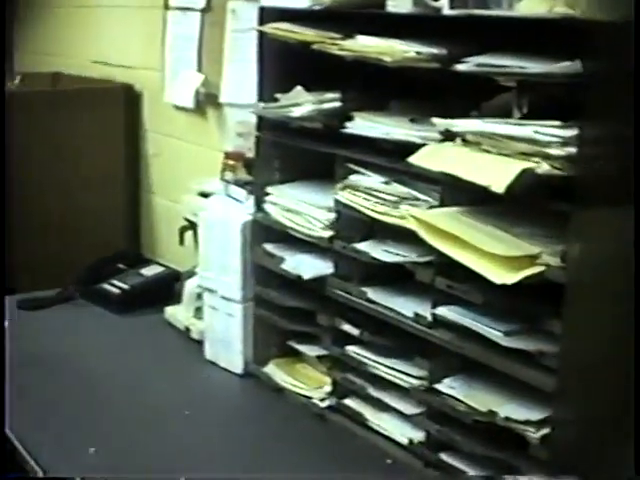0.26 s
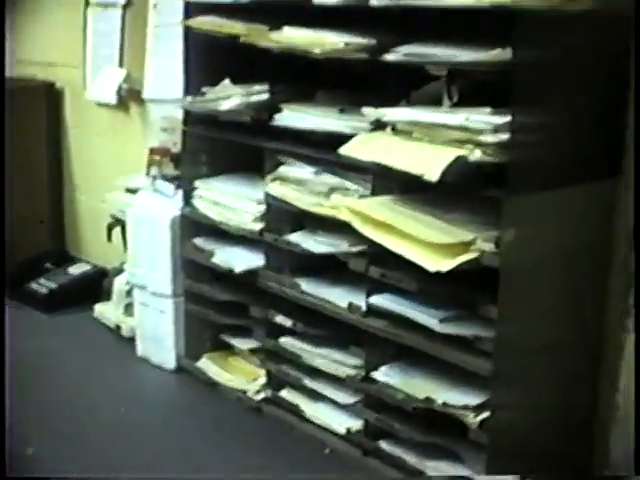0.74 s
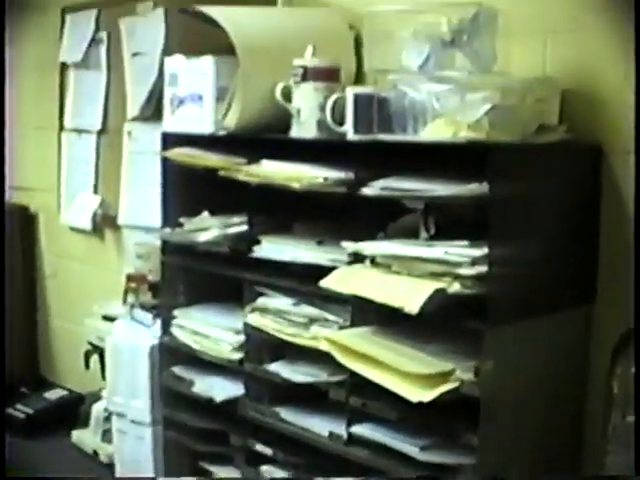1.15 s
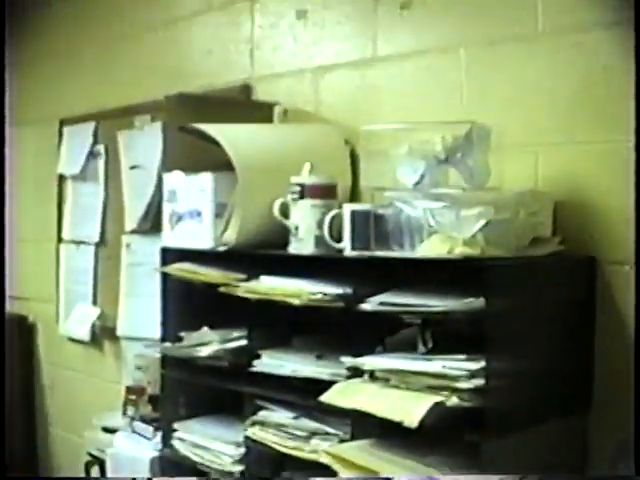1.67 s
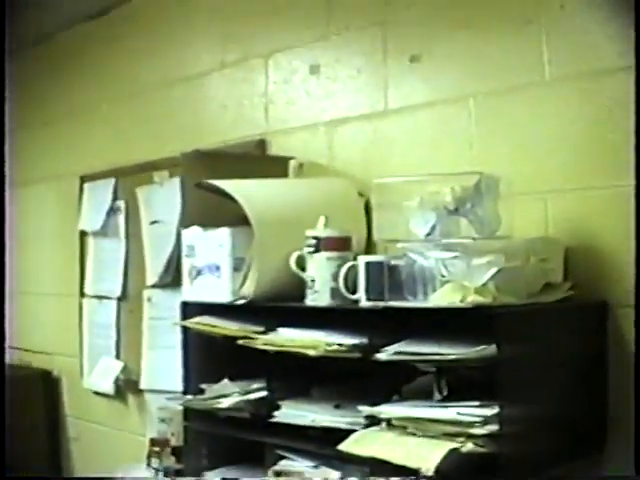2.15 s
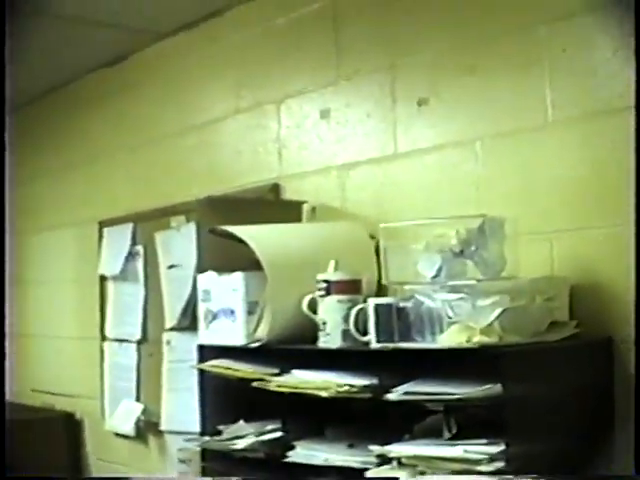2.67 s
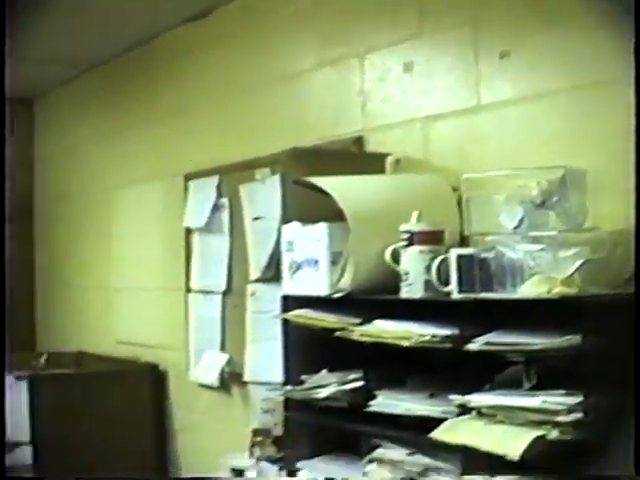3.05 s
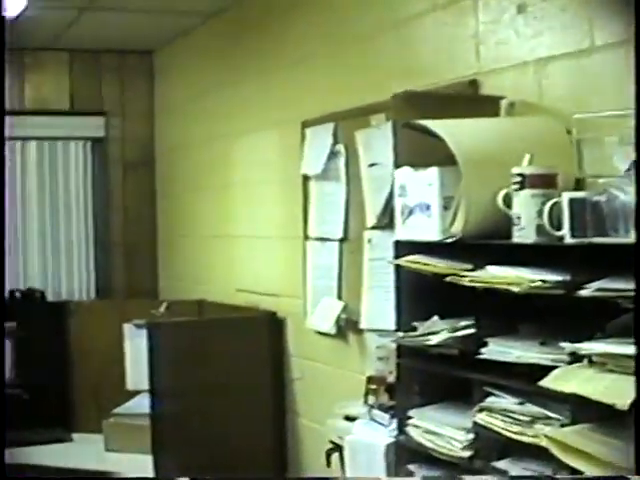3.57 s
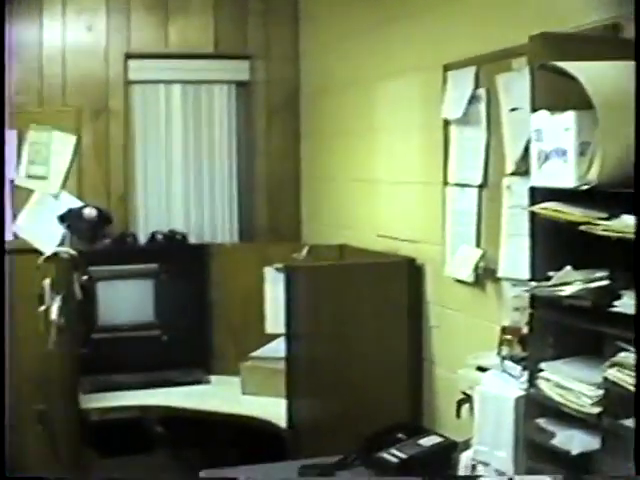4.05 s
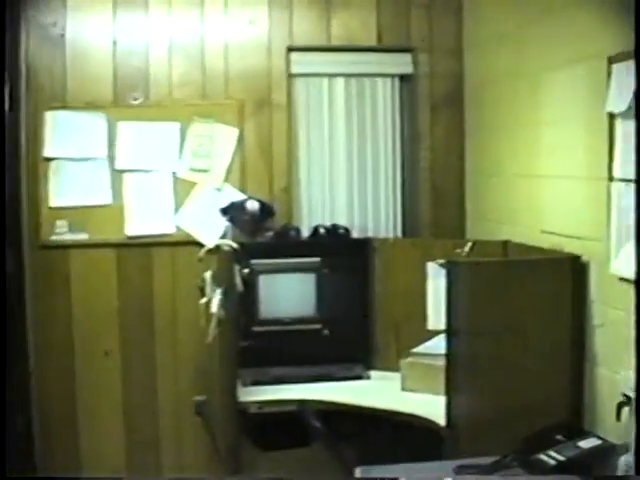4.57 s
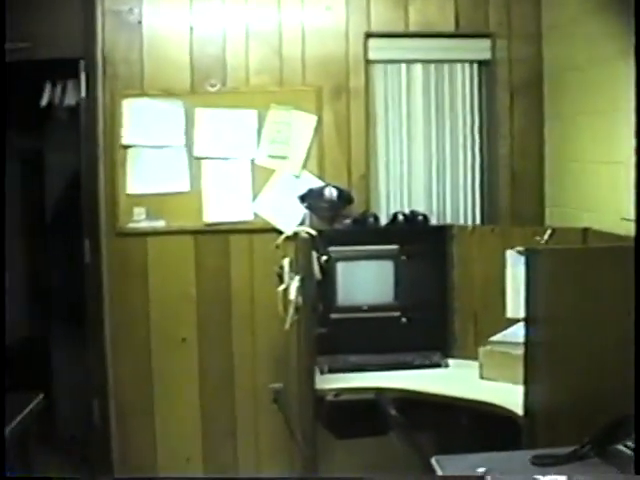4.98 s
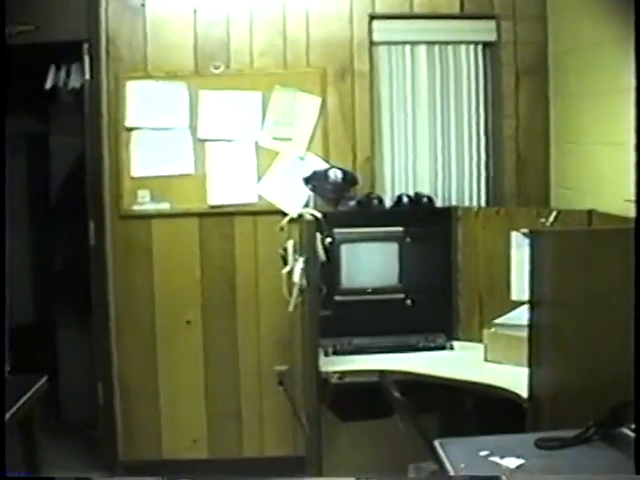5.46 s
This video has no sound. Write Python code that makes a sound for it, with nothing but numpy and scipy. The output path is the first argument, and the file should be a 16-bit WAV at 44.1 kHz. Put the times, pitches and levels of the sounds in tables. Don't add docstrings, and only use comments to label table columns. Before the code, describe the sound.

Inside a quiet office, a hand-held tape camera hears mostly itself: a low motor hum, a wavering whine, faint hiss and dull rumble. Small ticks and bumps come early, a brief brush near two seconds, then a hard knock at four and more sharp clacks towards the end, all very close to the built-in microphone.

```python
import sys
import numpy as np
from scipy import signal
from scipy.fft import rfft, irfft, next_fast_len
from scipy.io import wavfile
from scipy.ndimage import uniform_filter1d

SR = 44100
rng = np.random.default_rng(int(sys.argv[2]) if len(sys.argv) > 2 else 0)


def transcribe(signal):
    frames = np.atleast_2d(signal).T
    limited = np.clip(frames, -1, 1)
    pcm = np.round(limited * 32767).astype(np.int16)
    wavfile.write(sys.argv[1], SR, pcm)


def voltage_ratio(decibels):
    exponent = np.asarray(decibels, float) / 20
    return 10 ** exponent


N = 252252
FIELD_HZ = 60000 / 1001


def level(x, db):
    return x * voltage_ratio(db) / np.sqrt(np.mean(x ** 2))


def shaped(x, gain):
    size = next_fast_len(len(x))
    hz = np.arange(size // 2 + 1) * SR / size + 1e-3
    return irfft(rfft(x, size) * gain(hz), size)[:len(x)]


def resonance(x, hz, width_hz):
    return shaped(x, lambda f: 1 / (1 + ((f - hz * hz / f) / width_hz) ** 2))


def walk(rate):
    hold = int(SR / rate)
    held = np.repeat(rng.standard_normal(N // hold + 1), hold)
    return 1.5 * uniform_filter1d(uniform_filter1d(held, hold), hold)[:N]


def between(t, start_s, end_s, edge_s):
    return (np.tanh((t - start_s) / edge_s) - np.tanh((t - end_s) / edge_s)) / 2


def tone(phase, db, spread=1.):
    return np.sqrt(2) * voltage_ratio(db) * np.sin(phase + 2 * np.pi * spread * rng.random())


def ring(hz, db, t60, rise_s):
    t = np.arange(SR // 3) / SR
    swell = (1 - np.exp(-t / rise_s)) ** 2
    return voltage_ratio(db) * np.cos(2 * np.pi * hz * t) * swell * 1000. ** (-t / t60)


def add(out, s, x):
    i = int(s * SR)
    out[i:i + len(x)] += x[:N - i]


def hiss():
    # freq_hz, density_db
    floor = [(22, -6), (45, 2), (130, 8.5), (800, -3.5), (2000, -4.5), (6000, -8.5), (9000, -15),
             (16000, -18)]
    hz, db = np.transpose(floor)
    noise = rng.standard_normal(N)
    return level(shaped(noise, lambda f: voltage_ratio(np.interp(np.log(f), np.log(hz), db, left=-60))), -53.5)


def scan_whistle(t):
    # start_s, end_s, boost_db
    swells = [
        (-1, .8, 4),
        (1.75, 2.15, 3),
        (2.6, 4.5, 6),
    ]
    scan_db = -84 + sum(db * between(t, start_s, end_s, .08) for start_s, end_s, db in swells)
    return tone(2 * np.pi * 15734.2 * t, scan_db - 1) + tone(2 * np.pi * 15747.3 * t, scan_db - 4)


def leak(steady):
    # field_multiple, level_db (rms)
    lines = [(1, -68), (8, -78), (41, -76), (64, -84), (82, -76)]
    # first_multiple, teeth, level_db (rms), fade_db per tooth squared
    combs = [(116, 7, -84.5, .28), (172, 4, -95, 0), (182, 3, -94.5, .6), (200, 3, -95.5, 0)]
    teeth = [(k + 24 * n, db - fade_db * n * n) for k, count, db, fade_db in combs for n in range(count)]
    return sum(tone(k * steady / 3, db) for k, db in lines + teeth)


def rumble(t):
    # time_s, level_db, half_length_s
    squeezes = [(.14, -57, 0.084), (.52, -57, .1), (.78, -54, 0.07), (2.24, -66, .08), (3.72, -53.5, .15),
                (3.93, -57, .06), (4.11, -54, .08), (4.4, -61, 0.073), (4.83, -61, .08), (5.38, -53, 0.055),
                (5.58, -50, 0.066)]
    boom = voltage_ratio(-69.5) + sum(voltage_ratio(db) * np.exp(-((t - s) / half_s) ** 2) for s, db, half_s in squeezes)
    loose_db, tight_db = -50, -51.5
    box_db = tight_db + (loose_db - tight_db) * (1 - np.tanh((t - 2.7) / .2)) / 2

    tremor = rng.standard_normal((3, N)) * voltage_ratio(1.3 * walk(45))
    box = resonance(tremor[0], 225.4, 66) + voltage_ratio(-3.5) * resonance(tremor[1], 257.6, 78)
    box = shaped(box, lambda f: 1 / (1 + (f / 315) ** 12))
    slow_power = uniform_filter1d(uniform_filter1d(box ** 2, SR // 12), SR // 12)
    box = box / slow_power ** .35
    return boom * level(resonance(tremor[2], 97.6, 36), 0.34) + voltage_ratio(box_db) * level(box, 0.2)


def rub():
    # time_s, half_length_s, level_db, centre_hz, width_hz
    strokes = [
        (1.962, .022, -53, 3200, 4500),
        (4.028, .016, -47, 800, 900),
        (4.15, .04, -60, 800, 700),
        (2.4, .05, -61, 800, 500),
    ]
    out, t = np.zeros(N), np.arange(-SR // 8, SR // 8) / SR
    for s, half_s, db, hz, width_hz in strokes:
        grain_db = 4 * rng.standard_normal(len(t) // 40 + 1).repeat(40)[:len(t)]
        grains = rng.standard_normal(len(t)) * voltage_ratio(grain_db)
        add(out, s + t[0], level(resonance(grains, hz, width_hz), db) * np.exp(-(t / half_s) ** 2))
    return out


def favoured(peak_db, spot_hz, fall_db, modes):
    return [peak_db - max(fall_db, 0) * abs(np.log2(mode[0] / spot_hz)) for mode in modes]


def knocks():
    # pitch_hz, t60_s, polarity
    shell = [(98, 0.15, 1), (175.3, 0.14, 0.96), (210.2, 0.17, -0.97), (244.2, 0.073, -1.6),
             (275.5, 0.071, -1.64)]
    # pitch_hz, t60_s, polarity
    panel = [(449, 0.049, -0.81), (557, 0.06, 0.38), (690, 0.029, -1.3), (970, 0.023, 1),
             (1670, 0.0047, -1.6)]
    # time_s, boom_db (peak), box_db (peak), spot_hz, fall_db per octave
    thuds = [(.402, -59, -39.5, 240, 50), (.452, -51, -40, 225, 25), (3.255, -39.5, -45, 220, 5),
             (3.295, -40, -50, 230, 5), (3.601, -43, -52, 260, 20), (3.80, -36, -53, 190, 12),
             (4.0172, -21, -14, 263, 12), (4.185, -37, -43.5, 220, 5), (4.537, -32.5, -50, 220, 9),
             (4.5422, -50, -38, 215, 20), (4.9031, -28, -25.5, 240, 67), (5.485, -28.5, -55, 228, 5),
             (5.4907, -52, -36, 230, 40), (5.6584, -34, -22.5, 249.5, 60)]
    # time_s, peak_db, spot_hz, fall_db per octave, snap_db of the top mode
    clacks = [(.404, -41, 449, 25, -46), (.452, -39, 449, 40, -60), (1.96, -46, 449, 6, -52),
              (3.26, -50, 449, 20, -62), (3.60, -47, 570, 16, -60), (4.0156, -19.5, 449, 11, -33.5),
              (4.0195, -36, 760, 14, -49), (4.5325, -38, 540, 20, -55), (4.9025, -17.5, 513, 71, -37.5),
              (5.487, -43, 570, 30, -41), (5.53, -45, 480, 8, -55), (5.655, -23.5, 566, 44, -52)]
    blows = []
    for s, boom_db, *box in thuds:
        blows.append((s, [boom_db] + favoured(*box, shell[1:]), shell, .4))
    for s, *body, snap_db in clacks:
        blows.append((s, favoured(*body, panel[:3]) + [snap_db - 4.5, snap_db], panel, .22))

    out = np.zeros(N)
    for s, levels, modes, rise_cycles in blows:
        for db, (hz, t60, polarity) in zip(levels, modes):
            add(out, s, polarity * ring(hz, db, t60, rise_cycles / hz))
    return signal.lfilter(*signal.iirnotch(350, 4.5, SR), out)


def ticks():
    # time_s, crackle_db (peak), spread_octaves each side of the ring (at most .8 above), ring_hz,
    # ring_db
    slips = [(.309, -43, .35, 2100, -44), (0.3893, -35, 0.64, 2930, -43), (1.1512, -39, .9, 4330, -52),
             (4.015, -36, 0.6, 3830, -30), (4.0154, -32.5, .6, 5600, -33), (4.0162, -35, 0.66, 7000, -36.5),
             (4.124, -32, 1.5, 5980, -37), (4.1246, -36, 0.89, 7200, -41.5), (4.5186, -42, .6, 3350, -48),
             (4.5324, -46, .9, 2970, -38), (4.9037, -44, .8, 6000, -44), (5.485, -33.5, 0.94, 5930, -33),
             (5.6545, -41, .6, 7000, -52), (5.6545, -55, .3, 1800, -31.5), (5.6544, -55, .3, 1200, -31)]
    out, t = np.zeros(N), np.arange(SR // 100) / SR
    for s, db, octaves, ring_hz, ring_db in slips:
        slip = np.sign(rng.standard_normal(len(t))) * np.exp(-(t / 0.0012) ** 0.95)
        band_hz = ring_hz * 2. ** np.array([-octaves, min(octaves, .8)])
        snap = signal.sosfilt(signal.butter(3, band_hz, "band", fs=SR, output="sos"), slip)
        add(out, s, voltage_ratio(db) * snap / np.abs(snap).max())
        add(out, s, ring(ring_hz, ring_db, 0.01, 0.00013))
    return out


def gears(t):
    # pitch_hz, level_db (rms)
    train = [(35.0, -79), (141.3, -65), (270.0, -64), (561.7, -77), (944.0, -76), (979.5, -80),
             (1034.0, -78), (1123.9, -67), (1158.6, -73), (1170.9, -81), (1228.9, -63), (1299.2, -70),
             (1474.5, -80), (1528.5, -80), (1753.3, -80), (1937.2, -79), (2115.1, -71), (2202.9, -78),
             (2808.7, -82), (2914.3, -81), (2949.0, -80), (3464.0, -83), (4178.3, -79), (4388.9, -72),
             (5126.0, -78), (6179.5, -78),
             (2562, -84), (2670, -85), (2740, -85), (3728, -85), (3866, -83), (3937, -83), (4002, -83),
              (4022, -83), (4060, -84), (4424, -82), (5072, -83), (6250, -84)]
    slip_s = 6e-5 * walk(3.3)
    return sum(tone(2 * np.pi * hz * (t + slip_s), db + 1.5 * walk(3)) for hz, db in train)


def brushes(wobbly):
    # centre_hz, width_hz, level_db
    scraped = [(1305, 180, -71), (2098, 230, -70), (4110, 260, -71.5), (4420, 33, -72), (4920, 260, -70),
               (5540, 130, -74), (5930, 100, -72), (6320, 210, -72), (8240, 1600, -69.5)]
    gate = np.exp(0.86 * np.cos(wobbly))
    out = 0
    for hz, width_hz, db in scraped:
        scrape = resonance(gate * rng.standard_normal(N), hz, width_hz)
        out = out + level(scrape, db) * voltage_ratio(1.3 * walk(3.96))
    return out


def drive():
    orders = []
    for k in range(40, 87, 2):
        if k == 46:
            continue
        if k % 4:
            db = -86
        elif k % 8:
            db = -80
        else:
            db = -77 - .018 * (k - 54) ** 2
        orders.append((k, db))
    return orders


def drum(t, steady, wobbly):
    # order, level_db (rms)
    strong = [(1, -53), (2, -76), (5, -80), (6, -75), (7, -73), (8, -67), (9, -63), (10, -63), (11, -70),
              (12, -53), (13, -66), (14, -75), (15, -80), (16, -75), (17, -80), (18, -77), (19, -84),
              (20, -78), (24, -72), (25, -81), (26, -81), (27, -77), (28, -76), (29, -84), (30, -74),
              (31, -71), (32, -76), (33, -73), (34, -77), (36, -79)]
    # order, level_db (rms)
    weak = [(3, -84), (4, -82), (21, -86), (22, -86), (23, -85), (35, -88), (37, -87), (41, -89),
            (43, -87), (45, -87), (46, -83), (47, -86)]
    # time_s, level_db
    whine = [(0.0, -61), (0.03, -59), (0.41, -64.5), (1.08, -51.5), (1.8, -61.5), (2.18, -56),
             (3.08, -52.5), (3.2, -54), (3.51, -63), (3.73, -51.5), (3.84, -51.5), (4.03, -63.5),
             (4.19, -54.5), (4.54, -51.5), (5.42, -59), (5.72, -56.5)]
    whine_db = np.interp(t, *np.transpose(whine)) + 3
    out = 0
    for k, db in strong + drive() + weak:
        shell_borne = k < 37 or 44 < k < 48
        if not shell_borne:
            out = out + tone(k * steady, db + 0.95 * walk(2.5))
            continue
        if k == 12:
            db = whine_db
        else:
            sway_db = .6 if k == 1 or k > 23 else 1.2
            db = db + sway_db * walk(2.5)
        if k == 1:
            db = db + 2 * walk(14)
        turn = .8 * np.pi / (1 + np.exp(-2.5 * (k - 11.4))) + .35 * walk(1.5)
        out = out + tone(k * wobbly + turn, db, .08 if 7 < k < 15 else .55)
    return out


def scene():
    t = np.arange(N) / SR
    steady = 2 * np.pi * 3 * FIELD_HZ * t
    wobbly = steady + .024 * walk(10) + .014 * walk(60)
    electronics = hiss() + scan_whistle(t) + leak(steady)
    hand = rumble(t) + rub() + knocks() + ticks()
    motor = gears(t) + brushes(wobbly) + drum(t, steady, wobbly)
    return (electronics + hand + motor)[None]


def top_cut(x):
    return signal.sosfilt(signal.butter(12, 16340, fs=SR, output="sos"), x)


def record(dry):
    band = shaped(dry[0], lambda f: 1 / (1 + (f / 15765) ** 4000))
    return top_cut(band[None])


dry = scene()
out = record(dry)
transcribe(out)
```